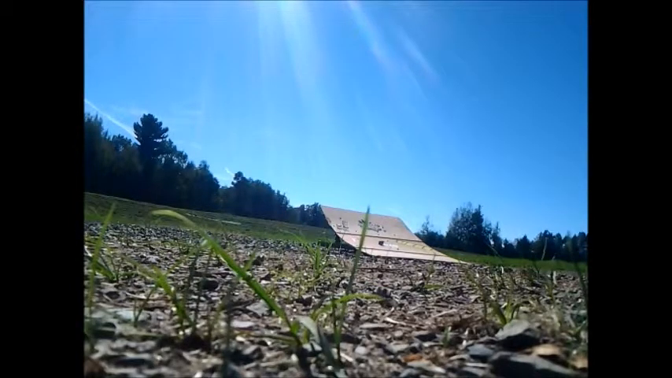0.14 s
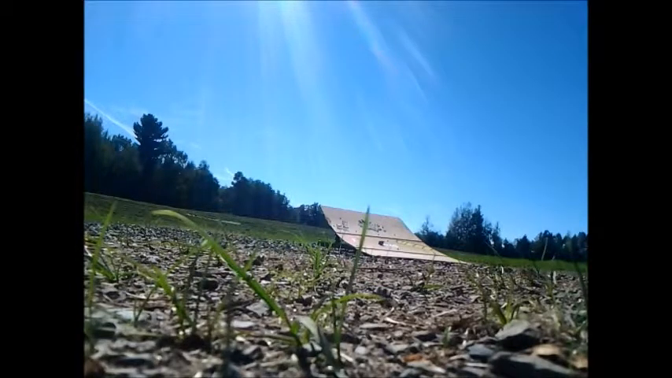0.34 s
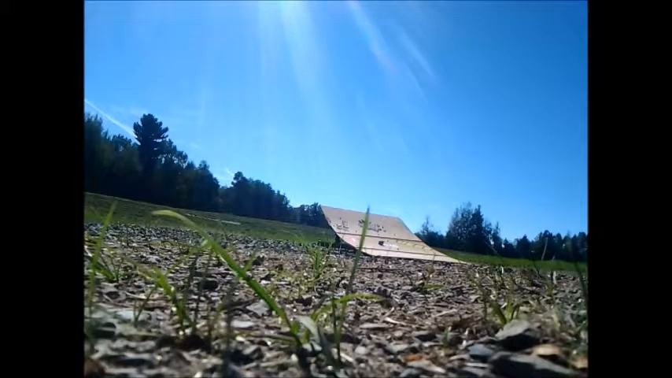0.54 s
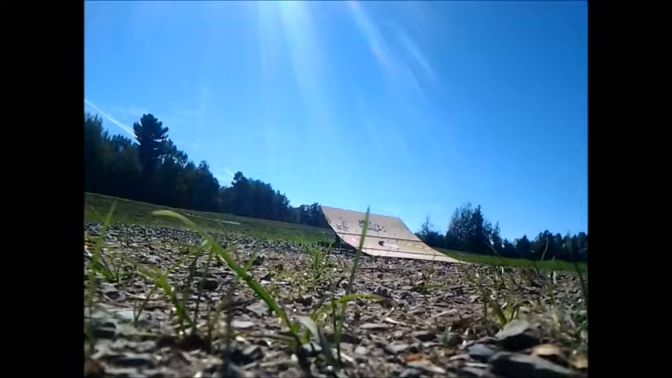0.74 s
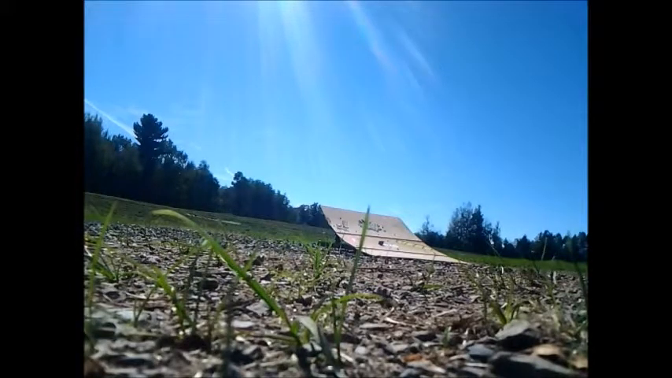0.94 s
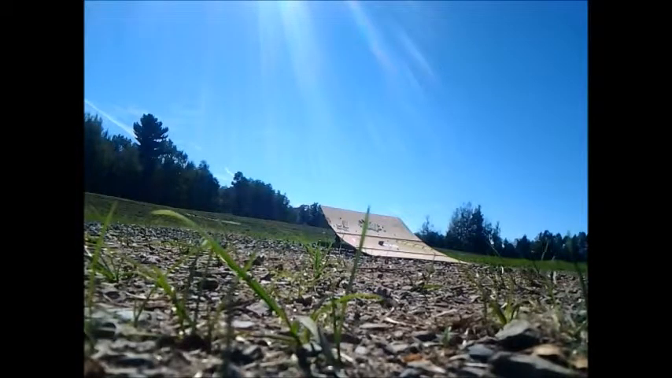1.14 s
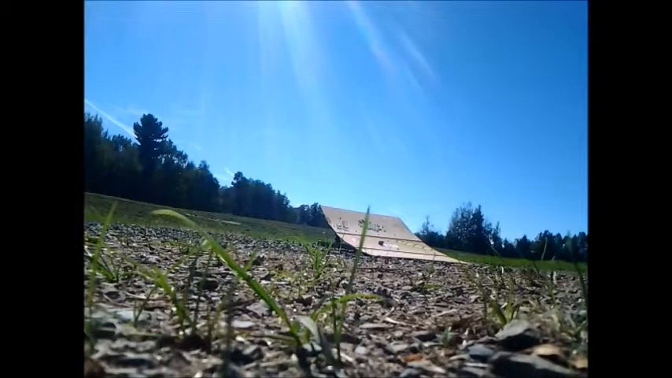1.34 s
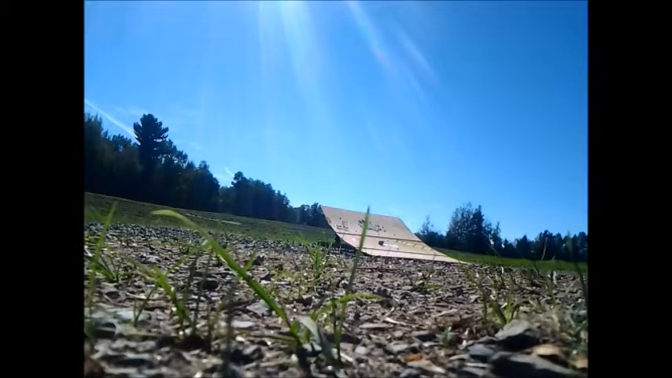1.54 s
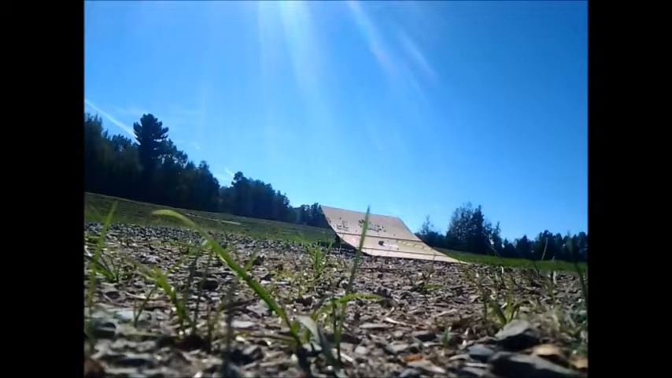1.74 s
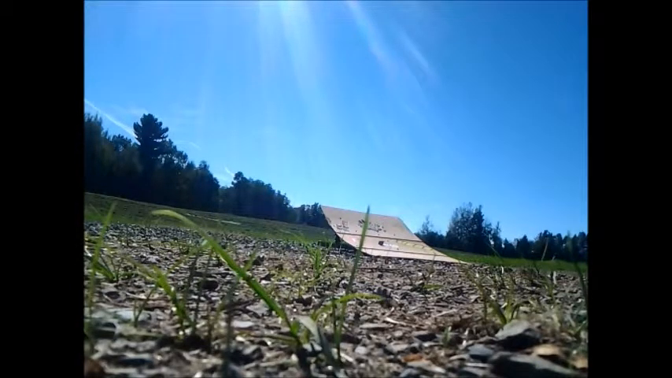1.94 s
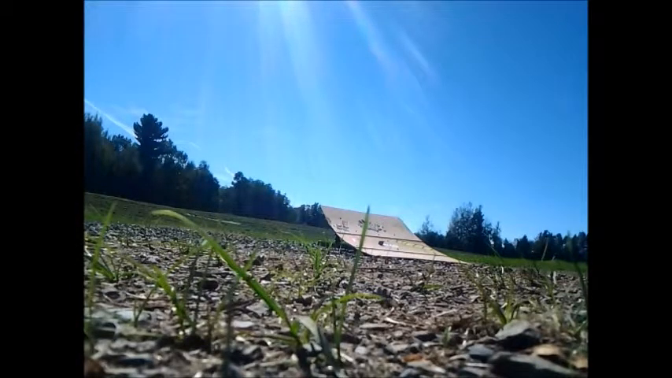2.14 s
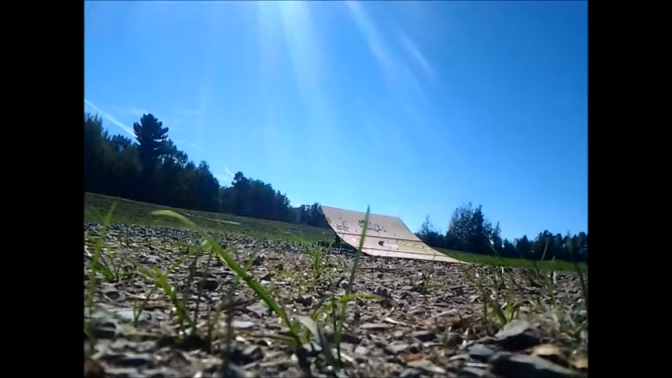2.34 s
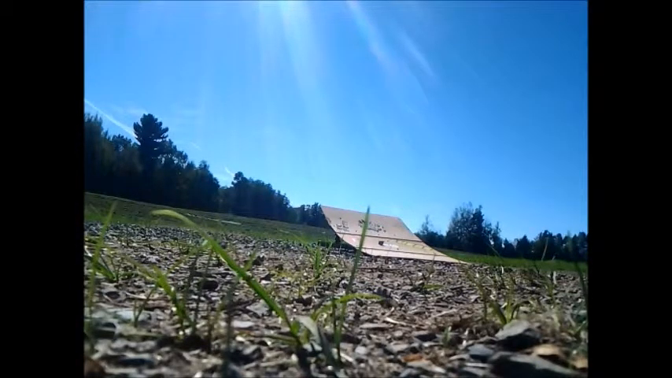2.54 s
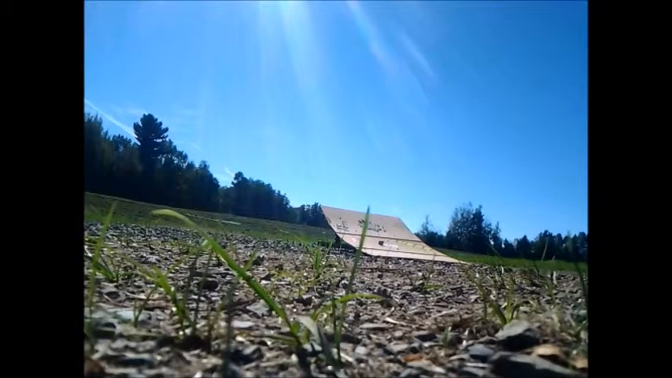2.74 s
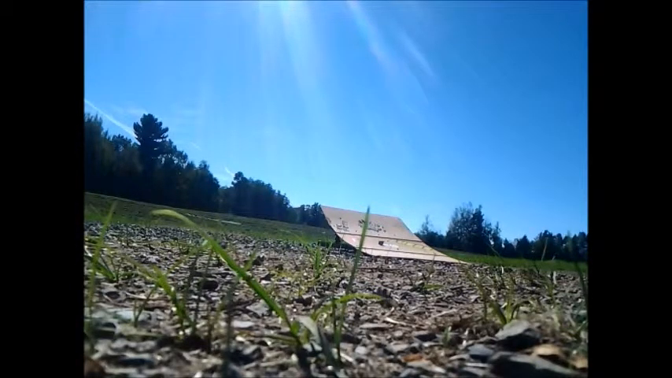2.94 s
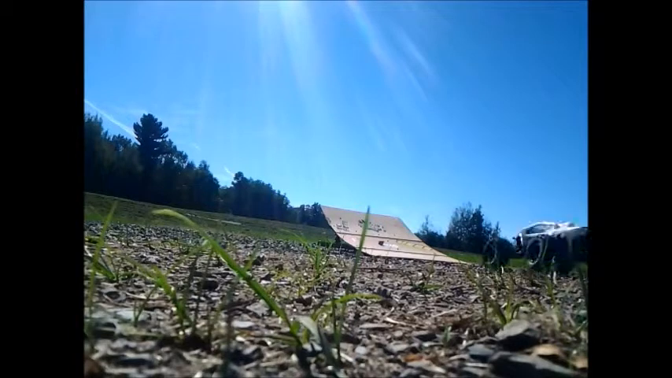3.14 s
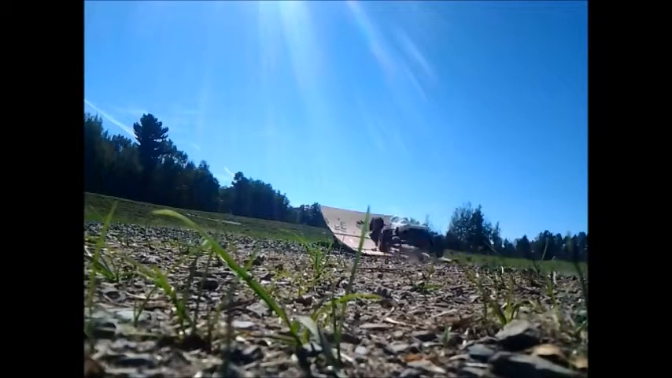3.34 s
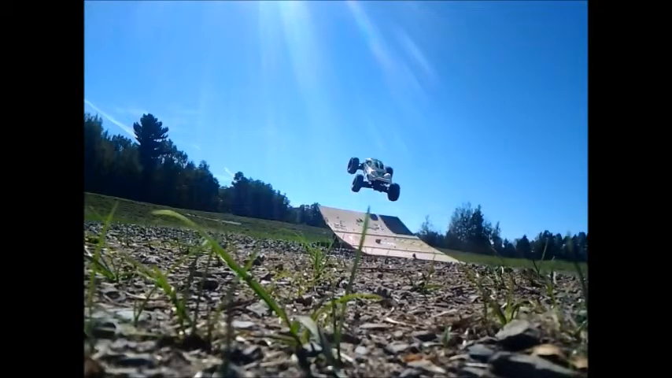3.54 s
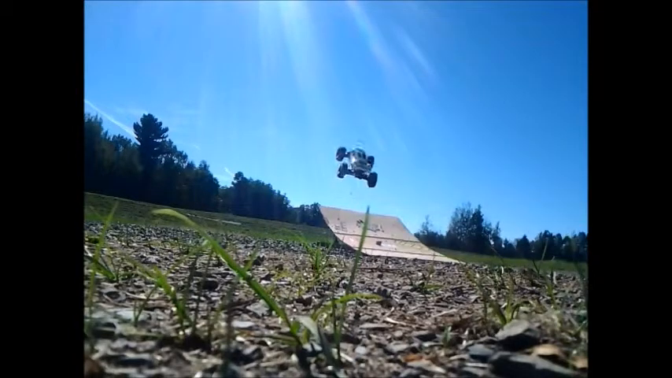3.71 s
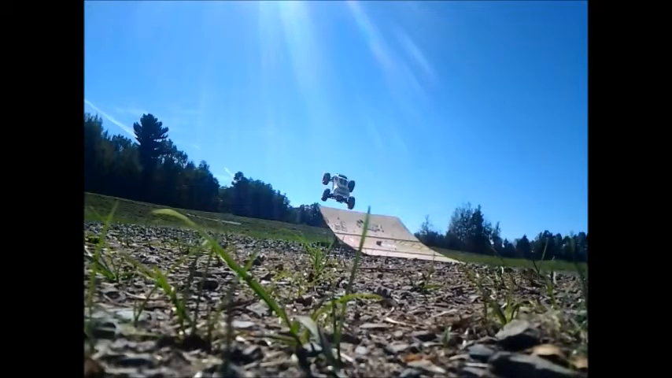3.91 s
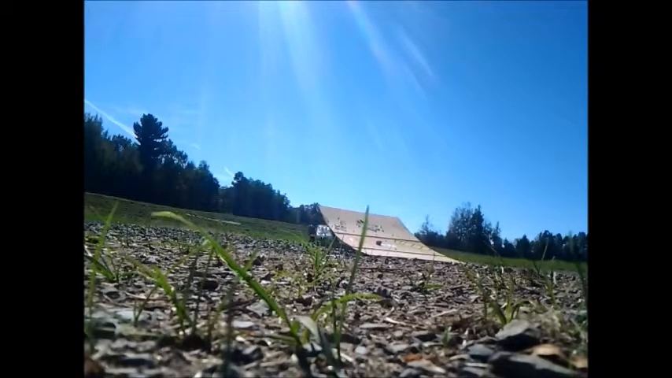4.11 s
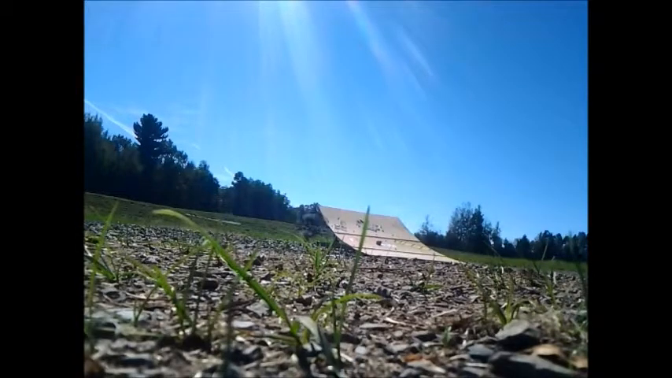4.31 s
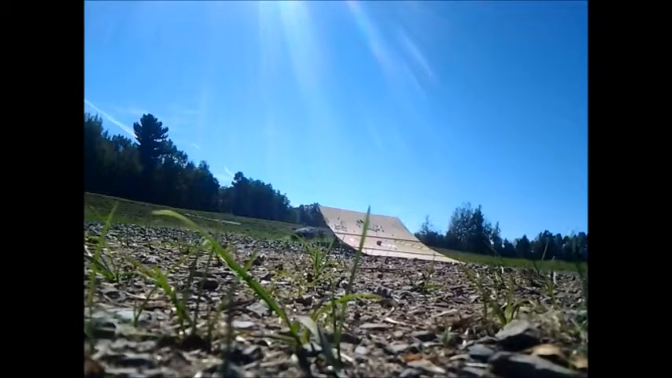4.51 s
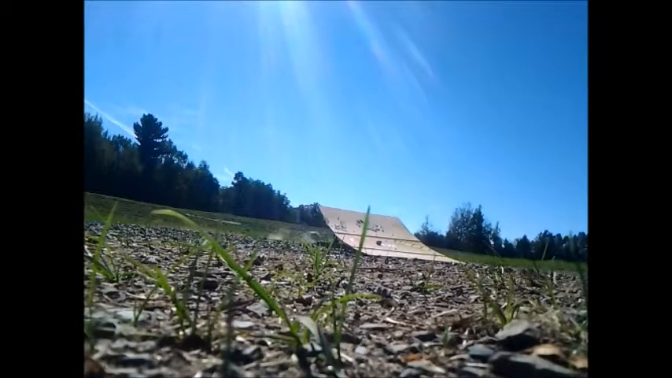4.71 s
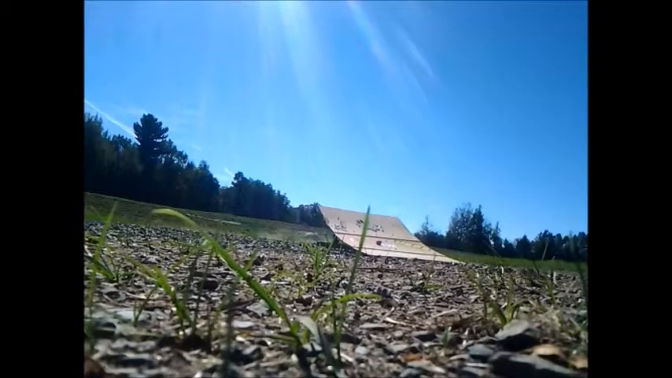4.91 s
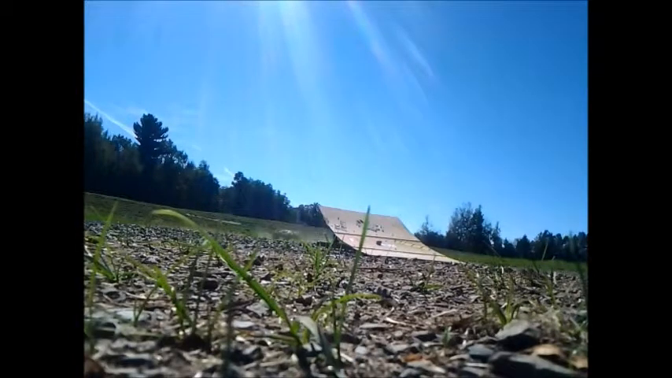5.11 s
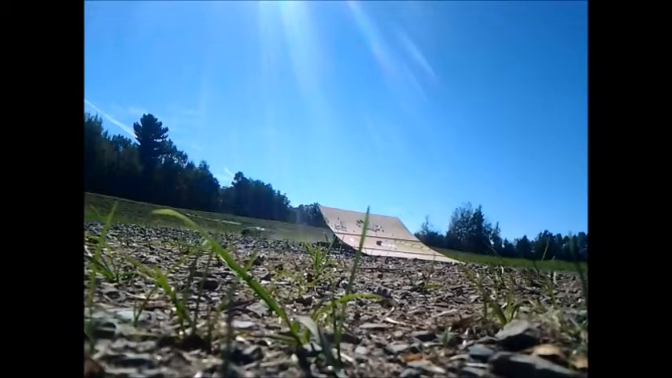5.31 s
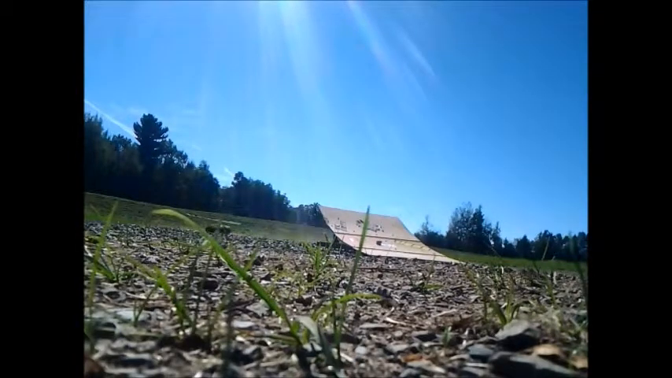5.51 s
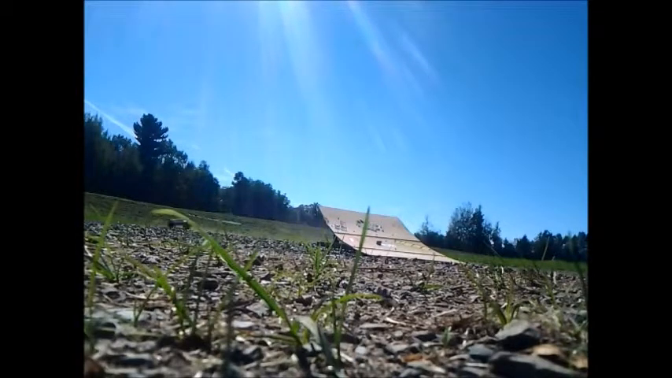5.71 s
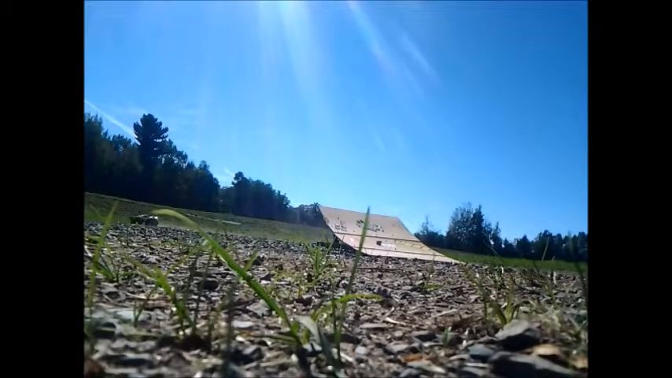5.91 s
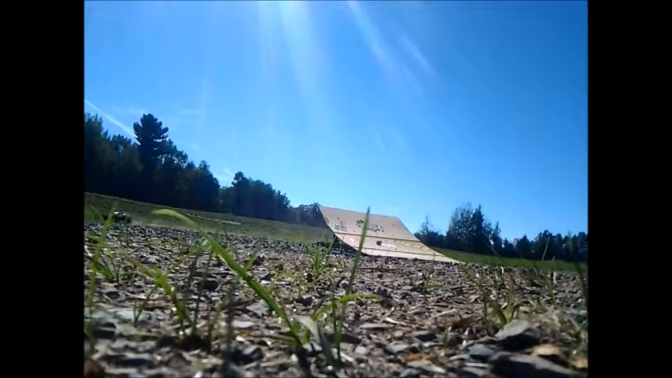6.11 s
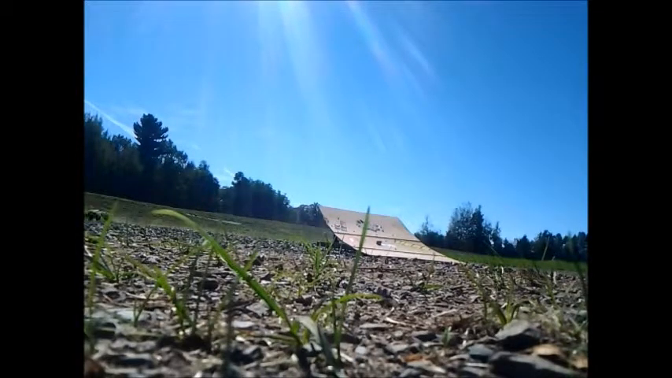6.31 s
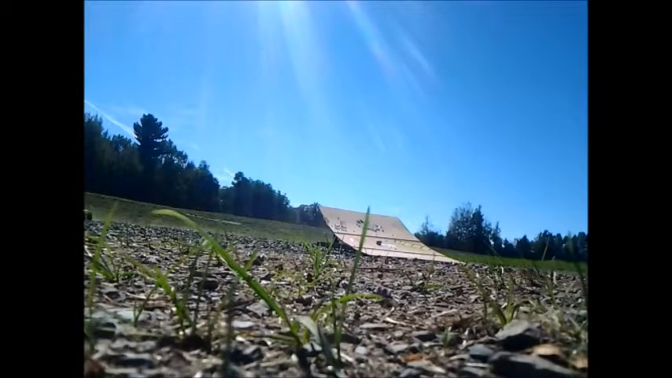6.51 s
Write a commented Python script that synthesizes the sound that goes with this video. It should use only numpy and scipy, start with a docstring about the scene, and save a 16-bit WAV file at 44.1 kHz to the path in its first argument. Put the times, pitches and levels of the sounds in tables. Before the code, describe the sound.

A quiet open field with low wind rumble, soft air murmur, faint distant hum and light hiss, with a tiny knock near 0.5 s. From about 1 s a thin electric gear whine emerges, wavering and rising in pitch as a small remote-control truck approaches; tyre crunch grows from 2 s, with knocks around 2.4 and 2.9. At 3.1-3.3 s it passes close to the ground-level microphone, loud, gritty, with sharp plastic clacks and chirring grit. At 3.5-3.65 it clatters up the wooden ramp, the whine flaring higher, then cutting off. The flight is quiet, with faint tyre noise and short squeaks. Around 4.25-4.38 s it lands in a cluster of heavy thumps and rattles; the whine returns, jerky, with more knocks until 4.8. It then runs off, whine pulsing, sagging very faint near 5.95, then reviving in uneven surges to the end at 6.5.

```python
"""Light wind, field murmur and a faint low hum come first; then a small electric off-road truck speeds in
over gravel and stubble, passes a camera lying on the ground, jumps a plywood ramp, lands with thumps
and runs off across the field. The gear whine is a gliding tone with overtones, tyre crunch is coloured
grains and noise, chassis knocks are decaying modes, squeaks and chirrs are wavering tones.
Wind and field murmur are filtered noise, as is the steady faint hiss under it all."""
import sys
import numpy as np
from scipy import signal
from scipy.fft import rfft, irfft, next_fast_len
from scipy.io import wavfile
from scipy.ndimage import uniform_filter1d

SR = 44100
rng = np.random.default_rng(int(sys.argv[2]) if len(sys.argv) > 2 else 0)


def log_audio(samples):
    """Write samples as a 16-bit WAV file to the path given in sys.argv[1]."""
    # one column per channel
    frames = np.atleast_2d(samples).T
    # limit to full scale, then quantise
    limited = np.clip(frames, -1, 1)
    pcm = np.round(limited * 32767).astype(np.int16)
    wavfile.write(sys.argv[1], SR, pcm)


N = 289291  # length of the scene [samples]

# Moments when one view of the truck hands over to the next. In pairs: start and end of each turn [s].
TURN_S = [2.2, 2.7, 3.3, 3.449, 3.9, 4.3]


def undb(db):
    """Decibels to gain."""
    return 10 ** (np.asarray(db) / 20)


def unit(x):
    """Scale to rms 1."""
    return x / np.sqrt(np.mean(x ** 2))


def colour(x, points):
    """Filter by (Hz, dB) points joined on a log-frequency axis."""
    size = next_fast_len(N)
    hz, db = np.transpose(points)
    log_hz = np.log(np.arange(size // 2 + 1) * SR / size + 1)
    gain = undb(np.interp(log_hz, np.log(hz), db))
    return irfft(rfft(x, size) * gain, size)[:N]


def band(x, lo_hz, hi_hz):
    """Steep band-pass."""
    return signal.sosfilt(signal.butter(3, [lo_hz, hi_hz], "bandpass", fs=SR, output="sos"), x)


def walk(rate):
    """Random levels held 1 / rate s and smoothed twice over that time; rms 1."""
    hold = int(SR / rate)
    steps = np.repeat(rng.standard_normal(N // hold + 1), hold)
    return unit(uniform_filter1d(uniform_filter1d(steps, hold), hold)[:N])


def ring(hz, t60, t):
    """One decaying mode."""
    return np.sin(2 * np.pi * hz * t) * np.exp(-np.log(1000) * t / t60)


def facing():
    """Side of the truck turned to the microphone: 0 front, 1 side, 2 on the ramp, 3 behind."""
    return np.interp(np.arange(N) / SR, TURN_S, [0, 1, 1, 2, 2, 3])


def tooth_motion():
    """Tooth rate [Hz] and level [dB]: the gears slow as the tyres bite and spin up as they slip."""
    # Each row: bite in seconds, tooth rate at bite in Hz, tooth rate at slip in Hz, loudest level in dB
    # before the sweep, distance and throttle cuts, place of the loudest moment in the cycle
    # (0 bite, 0.5 slip, 1 next bite).
    grips = [(0.948, 573, 597, -45, 0.89), (1.125, 593, 624, -44, 0.81), (1.235, 597, 620, -44.5, 0.5),
             (1.306, 591, 677, -46.5, 0.53), (1.384, 639, 664, -42.5, 0.59), (1.438, 626, 739, -40, 0.95),
             (1.546, 739, 806, -36.5, 0.41), (1.633, 730, 856, -37.5, 0.56), (1.722, 830, 996, -35, 0.79),
             (1.804, 962, 1270, -30, 0.7), (1.886, 1200, 1600, -31, 0.64), (1.934, 1456, 1773, -25.5, 0.43),
             (1.98, 1428, 1750, -25, 0.53), (2.045, 1650, 1612, -27, 0.16), (2.092, 1482, 1768, -25, 0.29),
             (2.142, 1540, 1724, -25, .3), (2.182, 1594, 1787, -24, .05), (2.219, 1667, 1830, -26, 0.17),
             (2.28, 1708, 1804, -22.5, 0.021), (2.341, 1843, 2025, -34.5, 0.53),
             (2.41, 1845, 2200, -28, 0.89), (2.455, 1967, 2120, -25, 0.65),
             (2.493, 1955, 2185, -23.5, 0.54), (2.526, 1892, 2196, -21, 0.4),
             (2.563, 1980, 2195, -21, 0.32), (2.598, 2018, 2080, -25, 0.86), (2.66, 2038, 2320, -18, 0.62),
             (2.711, 2244, 2330, -13, 0.59), (2.738, 2168, 2484, -15, 0.55),
             (2.782, 1972, 2231, -18.5, 0.44), (2.816, 2100, 2272, -16, 0.53),
             (2.847, 2135, 2440, -14, 0.68), (2.883, 2180, 2420, -13.5, 0.46),
             (2.917, 2145, 2400, -16.5, 0.32), (2.953, 2129, 2572, -16, 0.43),
             (2.987, 2282, 2387, -18.5, 0.88), (3.028, 2202, 2500, -16.5, 0.66),
             (3.081, 2136, 2320, -19, .3), (3.117, 2050, 2480, -17.5, 0.48),
             (3.162, 2148, 2400, -25, 0.053), (3.188, 2263, 2498, -15.5, 0.6),
             (3.217, 2380, 2500, -14.5, 0.41), (3.249, 2176, 2600, -20, 0.58),
             (3.299, 1960, 2090, -17, 0.16), (3.338, 1907, 2114, -23, 0.96), (3.385, 1964, 2230, -16, 0.8),
             (3.42, 2170, 2243, -14.5, 0.55), (3.445, 2197, 2181, -12.5, 0.42),
             (3.504, 2056, 2272, -10.5, 0.052), (3.53, 2155, 2230, -14, 0.51),
             (3.553, 2132, 2232, -9.5, 0.5), (3.575, 2198, 2440, -17.5, 0.91),
             (3.637, 2490, 3364, -23, 0.44), (3.69, 3400, 3890, -31, 0.023),
             (4.35, 2200, 2193, -27.5, 0.64), (4.399, 1480, 2310, -26, 0.62),
             (4.438, 2120, 2440, -22.5, 0.8), (4.472, 1876, 2640, -27, 0.99),
             (4.514, 2580, 2826, -25.5, 0.71), (4.562, 2057, 3240, -27, 0.97),
             (4.605, 2604, 2890, -24, .75), (4.656, 1827, 2325, -24, 0.82), (4.716, 2300, 2320, -26, 0.72),
             (4.784, 1225, 1573, -24.5, .5), (4.835, 1414, 1717, -25.5, 0.38),
             (4.884, 1710, 1830, -28.5, 0.67), (4.929, 1420, 1730, -25, 0.26),
             (4.974, 1772, 2006, -23.5, 0.46), (5.023, 1827, 1932, -25.5, 0.42),
             (5.062, 1450, 1987, -25, 0.021), (5.102, 1640, 1877, -32, 0.56),
             (5.139, 1594, 2083, -28, 0.73), (5.179, 1483, 2002, -27, 0.65), (5.222, 1445, 1953, -34, 0.4),
             (5.263, 1443, 2225, -22.5, 0.29), (5.308, 1670, 1847, -33, 0.45),
             (5.345, 1581, 1970, -23.5, 0.52), (5.401, 1657, 1902, -24, 0.53),
             (5.463, 1690, 1813, -27.5, 0.55), (5.506, 1770, 2040, -21.5, 0.44),
             (5.56, 1775, 1930, -21.5, 0.57), (5.596, 1746, 2447, -21.5, 0.85),
             (5.667, 1480, 2176, -27.5, 0.8), (5.751, 1293, 1586, -30.5, 0.73),
             (5.865, 1157, 1370, -40, 0.82), (5.955, 1121, 1254, -51, 0.57), (6.033, 1010, 1137, -38, 0.71),
             (6.105, 919, 1300, -30.5, 0.64), (6.161, 893, 1550, -28, 0.05), (6.219, 900.6, 1440, -25, 0.1),
             (6.278, 1204, 1453, -25, 0.056), (6.333, 1173, 1787, -22.5, 0.045),
             (6.387, 1370, 1900, -23, 0.75), (6.438, 1046, 1535, -20, 0.26),
             (6.495, 1444, 1614, -20.5, 0.39), (6.533, 1138, 1385, -30.5, 0.36)]
    # Spinning up drags as the truck pulls away again.
    # Each row: time in seconds, part of the cycle spent spinning up, longest spin-up in seconds.
    spin_up = [(1, .52, .035), (5.5, 0.56, .034), (5.6, 0.46, .025), (5.7, 0.4, .028), (6.1, 0.57, .034),
               (6.28, 0.54, .034), (6.33, 0.704, .04), (6.39, 0.45, .04), (6.44, 0.72, .045)]
    # Sinking of the whine half a cycle from its loudest; rough ground breaks it up more.
    # Each row: time in seconds, sinking in dB.
    swing = [(1.1, 8.5), (1.85, 5.5), (2.05, 2.5), (2.3, 13), (2.5, 14.5), (3.35, 11.5), (3.5, 12),
             (3.65, 2), (4.38, 18), (4.41, 16), (4.44, 4.5), (4.48, 15), (4.6, 25), (4.68, 21),
             (4.72, 13.5), (4.79, 6), (4.9, 7), (5.1, 16), (5.2, 1), (5.3, 15), (5.4, 17), (5.5, 14),
             (5.6, 17), (5.68, 19), (5.8, 21), (5.95, 21), (6.1, 21), (6.16, -0.5), (6.2, 6), (6.35, 7),
             (6.5, 7)]
    # Throttle for the jump: starts closing, closed, starts opening on landing, open [s].
    airborne_s = (3.7, 3.74, 4.3, 4.361)
    coast_db = -35
    emerge_s, hidden_db = (0.88, 1.22), -19  # the whine rises out of the distance
    spin_db, brake_db = 0.23, 0.03  # level lost per kHz/s of speeding up, of slowing down [dB]

    s, bite_hz, slip_hz, peak_db, loudest = np.transpose(grips)
    spin_s, share, longest_s = np.transpose(spin_up)
    cycle_s = np.diff(s, append=N / SR)
    lag_s = np.interp(s, spin_s, share.clip(.1, .9)) * cycle_s
    lag_s = np.minimum(lag_s, np.interp(s, spin_s, longest_s))

    # four load points per cycle
    quarters = np.arange(4) / 4
    sinking = np.sin(np.pi * (quarters - loudest[:, None])) ** 2
    loads_db = peak_db[:, None] - np.interp(s, *np.transpose(swing))[:, None] * sinking

    # bites and slips alternate; the tiny steps keep the times increasing
    t = np.arange(N) / SR
    turns_s = np.c_[s, s + lag_s].ravel() + 1e-6 * np.arange(2 * len(s))
    turns_s = np.maximum.accumulate(turns_s)
    order = np.arange(len(turns_s))
    place = np.interp(t, turns_s, order)
    part = place % 1
    # the spinning mass rounds each turn
    eased = place - part + (1 - np.cos(np.pi * part)) / 2
    hz = np.interp(eased, order, np.c_[bite_hz, slip_hz].ravel())

    db = np.interp(2 * place, np.arange(2 * len(turns_s)), loads_db.ravel())
    sweep = np.gradient(hz) * SR / 1000  # [kHz/s]
    # teeth unload most while the wheels spin free
    db = db - spin_db * sweep.clip(0, None) + brake_db * sweep.clip(None, 0)
    db = db + np.interp(t, emerge_s, [hidden_db, 0])
    db = db + np.interp(t, airborne_s, [0, coast_db, coast_db, 0])
    return hz, db


def gears():
    """Meshing teeth: a tone that swings smoothly between bite and slip, with uneven tooth contact."""
    # Each row: multiple of the tooth rate, level in dB before the tooth-edge level and end-on shade.
    overtones = [(2, -10), (3, -26)]
    # Tooth edges against the tone. Each row: time in seconds, level in dB.
    edges = [(1.5, 8), (1.9, -5), (2.2, -7), (2.45, 9), (2.6, 10.5), (2.72, -1.5), (2.85, 11), (3.0, 10),
             (3.15, 4), (3.3, 5.5), (3.45, -17), (3.9, -13), (4.4, 3), (4.5, 6), (4.6, -4), (4.75, -18),
             (4.85, -2), (5.0, -7), (5.2, -16), (5.4, -12), (5.6, -5), (5.8, -13), (6.1, -1), (6.3, -5),
             (6.4, -1), (6.47, -5), (6.56, 6)]
    # Pitches that chassis shell and camera housing favour. Each row: frequency in Hz, gain in dB.
    shell = [(500, -4), (900, 2), (1250, -4.5), (1550, -12), (1900, -6), (2250, -4), (2600, -6.5),
             (3000, -10.5), (4000, -2), (5500, -38), (8000, -130)]
    # Shell panel: low edge in Hz, high edge in Hz, level against the whine in dB, reach in Hz.
    panel = (2294, 2464, -14, 514)
    shade_db_per_khz = 12.5  # seen from either end, the shell hides the treble of the gears

    hz, db = tooth_motion()
    phase = 2 * np.pi * np.cumsum(hz * (1 + .018 * walk(300))) / SR
    tone = np.sin(phase) * undb(2.0 * walk(150))
    edges_db = np.interp(np.arange(N) / SR, *np.transpose(edges))
    end_on = np.clip(abs(facing() - 1.5) - .5, 0, 1)
    for multiple, rel_db in overtones:
        # overtones come from tooth edges, which wander and break up
        shade_db = shade_db_per_khz * np.clip(multiple * hz - 2700, 0, None) / 1000 * end_on
        gain = undb(rel_db + edges_db - shade_db + 4 * walk(45))
        tone = tone + gain * np.sin(multiple * phase + .9 * walk(220))

    # the overtone at twice the tooth rate rattles the panel whenever it passes its pitch
    lo_hz, hi_hz, panel_db, reach_hz = panel
    near = np.exp(-((2 * hz - (lo_hz + hi_hz) / 2) / reach_hz) ** 2)
    rattle_gain = uniform_filter1d(near * undb(db + panel_db), SR // 60)
    rattle = unit(band(rng.standard_normal(N), lo_hz, hi_hz)) * rattle_gain
    return np.sqrt(2) * colour(undb(db) * tone, shell) + rattle


def scatter(x):
    """Rough ground returns a short diffuse smear."""
    smear_db, smear_t60_s = -15, .08
    t = np.arange(SR // 8) / SR
    tail = rng.standard_normal(len(t)) * np.exp(-np.log(1000) * t / smear_t60_s)
    tail = tail * (t > .003)
    return x + undb(smear_db) * signal.fftconvolve(x, tail / np.sqrt(np.sum(tail ** 2)))[:N]


def roll_levels():
    """Rumble, crunch, scrub and grit in dB: the passing level plus a brief change at each jolt."""
    # Each row: time in seconds, tyre crunch in dB, rumble against it in dB, grit spray against it in dB.
    roll = [(0, -64.5, 12.5, 3), (.5, -57.5, 7.5, -2.5), (1.15, -47.5, -4, -9), (1.41, -52, 1.5, -1),
            (1.549, -47, -5.5, -2.5), (2.05, -41.5, -6.5, 0), (2.35, -37, -13, -1.5), (2.5, -33, -15, -0.5),
            (2.75, -28.5, -10.5, -2), (2.92, -26.5, -16.5, -0.5), (3.08, -25, -11.5, -3),
            (3.229, -22, -6.5, -1.5), (3.327, -28.5, -10.5, 0.5), (3.47, -24.5, -1.5, -15.5),
            (3.58, -20.5, -6.5, -14.5), (3.68, -26, -5.5, -10.5), (3.779, -34, -10.5, -14),
            (3.9, -39.5, -6.5, -12), (4.13, -44, -14.5, -14.5), (4.4, -37.5, -16, -14),
            (4.55, -36, -14, -11), (4.95, -40.5, -6, -13.5), (5.5, -36, -9.5, -20), (5.7, -38, -8.5, -16.5),
            (5.78, -42.5, -7.5, -20), (6.0, -37.5, -16, -20.5), (6.1, -40.5, -11, -17.5),
            (6.17, -36.5, -17, -18), (6.27, -37.5, -7.5, -12), (6.56, -40, -9, -14)]
    # The tyres slam over a rut or touch down.
    # Each row: time in seconds, rise of the rumble in dB, rise of the crunch, scrub and grit in dB.
    jolts = [(2.41, 7, 0), (2.938, 12.5, 2), (3.05, 7.5, 2.5), (3.2, 2.5, -2), (3.29, 8, -2.5),
             (3.509, 4, -0.5), (3.761, 10, 2), (3.83, -1, 4), (3.963, 2, 6), (4.06, 4, 4.5), (4.2, 7, 10),
             (4.276, 30, 11.5), (4.343, 29, 6.5), (4.65, 11, -5), (4.74, 16, 2.5)]
    jolt_s = 0.023
    # Scrub against the crunch [dB] from the front, side, ramp, behind, before its share of the grit.
    scrub_db = [-3, 0.5, 5, 5.5]
    scrub_share = 0.59  # share of the grit's swell that the scrub follows

    t = np.arange(N) / SR
    s, *columns = np.transpose(roll)
    crunch, rumble, grit = (np.interp(t, s, column) for column in columns)
    low, mid = sum(np.outer(rise, np.exp(-((t - at) / jolt_s) ** 2)) for at, *rise in jolts)
    scrub = np.interp(facing(), range(4), scrub_db) + scrub_share * grit
    return crunch + np.array([rumble + low, mid, scrub + mid, grit + mid])


def tyres():
    """Stones and stalks crushed under knobbly tyres: dense uneven grains, coloured by the side that faces us."""
    # Tyre colour from the front, side, ramp and behind. Each row: frequency in Hz, density in dB per Hz.
    front = [(53, -39), (90, -9), (155, -11.5), (212, -12.5), (311, -15.5), (567, -2), (1130, 11),
             (1360, -12.5), (1690, 5.5), (2030, 4), (2390, 5.5), (3080, -25), (3380, -20.5), (4440, -23.5),
             (7000, -44), (9100, -96), (15400, -120)]
    side_on = [(53, -29), (90, -9), (224, -2), (416, -0.5), (787, 6.5), (1090, 4), (1430, -10.5),
               (1690, -3.5), (1960, 9.5), (2300, -8), (3080, -30.5), (4520, -37.5), (7000, -43.5),
               (9100, -93), (15400, -120)]
    ramp = [(53, -39), (90, -32.5), (190, -23), (224, -26.5), (311, -17), (353, -20), (609, -12),
            (910, -1.5), (1380, -15.5), (2140, -1), (2570, -19), (3300, -18.5), (4520, -13), (7000, -46),
            (9100, -77), (15400, -120)]
    behind = [(53, -23), (90, -20), (220, -17), (340, -16.5), (560, -4), (720, 3.5), (831, 7), (960, 2),
              (1170, 3), (1290, -11), (1430, -4.5), (1540, -12.5), (2260, -1), (2620, -19), (3200, -27.5),
              (4000, -31.5), (4860, -37), (7000, -140), (9100, -77), (15400, -120)]
    # Rumble, crunch, scrub and grit. Each row: low edge in Hz, high edge in Hz.
    roll_bands = [(60, 400), (400, 1500), (1500, 3000), (3000, 6500)]
    # Unevenness of each band.
    # Each row: share of the truck's hop in dB, own flicker in dB, flicker rate per second.
    roll_flicker = [(-1.5, -1, 18), (0.23, 1.8, 45), (2.4, -0.46, 17), (1.9, 1.54, 98)]
    # Fine dust thrown up close by. Each row: time in seconds, coarse level in dB, fine level in dB.
    dust = [(2.3, -102, -96), (2.6, -81, -97), (2.9, -58.5, -99), (3.2, -54, -61), (3.35, -48.5, -49.5),
            (3.45, -70, -80), (3.55, -58, -64), (3.671, -48, -44.5), (3.8, -75, -60), (4.05, -64.5, -66.5),
            (4.2, -79, -75)]
    # The plastic body shell drums along: low and high edge [Hz].
    body_ring = (730, 869)
    # Drumming against the crunch [dB] from the front, side, ramp, behind.
    body_db = [-14, -10, -23, -9]

    t = np.arange(N) / SR
    levels, view = roll_levels(), facing()
    chance = rng.random((2, N))
    struck = chance[0] < 3000 / SR  # about 3000 stones a second
    sizes = undb(-1.5 * np.log(1 - .995 * chance[1]))
    stones = struck * sizes * rng.standard_normal(N)
    grains = unit(stones) + 1.5 * rng.standard_normal(N)

    seen = [colour(grains, points) for points in (front, side_on, ramp, behind)]
    hop = walk(16)  # the whole truck hops on its springs
    out = 0
    for level_db, (lo_hz, hi_hz), (hop_db, own_db, rate) in zip(levels, roll_bands, roll_flicker):
        part = sum(np.clip(1 - abs(view - k), 0, 1) * unit(band(x, lo_hz, hi_hz))
                   for k, x in enumerate(seen))
        out = out + part * undb(level_db + hop_db * hop + own_db * walk(rate))

    dust_s, *dust_db = np.transpose(dust)
    puffs = undb(3.0 * walk(18))
    for db, edges_hz in zip(dust_db, [(6000, 9500), (9500, 16000)]):
        gain = undb(np.interp(t, dust_s, db, left=-120, right=-120))
        out = out + puffs * unit(band(grains, *edges_hz)) * gain

    # low-passed grains ride on a tone; the flexing shell shifts its pitch
    lo_hz, hi_hz = body_ring
    centre_hz = (lo_hz + hi_hz) / 2 * (1 + .06 * walk(9))
    carrier = np.sin(2 * np.pi * np.cumsum(centre_hz) / SR)
    drum = unit(band(grains, 1, (hi_hz - lo_hz) / 2) * carrier)
    drum_db = levels[1] + np.interp(view, range(4), body_db) + 3.38 * walk(30)
    return out + drum * undb(drum_db)


def chirrs():
    """A rough flutter of seven continuous wavering tones inside the grit, heard only while side on."""
    chirr_hz = [3350, 3550, 3750, 3950, 4200, 4450, 4700]  # centre of each wavering tone [Hz]
    chirr_db = -11  # each tone against the grit
    side_share = np.interp(np.arange(N) / SR, TURN_S[:4], [0, 1, 1, 0])
    flutter = 0
    for hz in chirr_hz:
        phase = 2 * np.pi * np.cumsum(hz * (1 + .035 * walk(220))) / SR
        flutter = flutter + np.sin(phase) * undb(4.0 * walk(170))
    return flutter * side_share * undb(roll_levels()[3] + chirr_db)


def knocks():
    """Each blow thuds into the ground, rings the chassis modes, one panel most, and throws a scatter of dirt."""
    # Chassis blows. Each row: start in seconds, peak level in dB, main ring in Hz.
    blows = [(.462, -45, 915), (2.4, -26, 844), (2.468, -27, 1033), (2.918, -20.5, 850), (3.138, -13, 676),
             (3.176, -8, 745), (3.289, -23, 977), (3.367, -14, 1050), (3.476, -14.5, 655),
             (3.498, -12, 334), (3.556, -13.5, 400), (3.596, -9, 1189), (3.616, -10.5, 1204),
             (3.638, -14, 1250), (4.254, -21, 980), (4.272, -15.5, 421), (4.283, -12, 1114),
             (4.314, -24, 798), (4.336, -15, 637), (4.349, -30, 688), (4.377, -28, 1020), (4.513, -24, 696),
             (4.634, -18, 770), (4.66, -33, 800), (4.721, -21.5, 627), (4.738, -21.5, 1128),
             (4.748, -25.5, 895), (4.775, -22, 1104), (5.357, -32, 826)]
    # Modes shared by all blows, shifted a little at each.
    # Each row: centre frequency in Hz, level against the main ring in dB, t60 in seconds.
    chassis = [(129.9, -33, 0.028), (360, -19.5, 0.014), (653, -1.5, 0.042), (1144, -3.5, 0.046)]
    # Scatter of dirt. Each row: frequency in Hz, gain in dB.
    dirt_colour = [(300, -22), (900, -5), (1500, -8), (2200, 22), (3200, -4), (4500, -6), (6500, -73)]
    panel_t60_s, thud_db, dirt_db = 0.059, -4.5, -10.5

    out, t = np.zeros(N + SR), np.arange(SR // 5) / SR
    jitters = rng.standard_normal((len(blows), len(chassis)))
    for (s, peak_db, hz), jitter in zip(blows, jitters):
        blow = ring(hz, panel_t60_s, t)
        for (mode_hz, mode_db, mode_t60), shift in zip(chassis, jitter):
            blow = blow + undb(mode_db) * ring(mode_hz * (1 + 0.066 * shift), mode_t60, t)
        thud = unit(band(rng.standard_normal(len(t)), 150, 1130)) * np.exp(-t / 0.005)
        burst = rng.standard_normal(len(t)) * np.exp(-t / 0.0028)
        dirt = colour(np.pad(burst, (0, N - len(t))), dirt_colour)[:len(t)]
        blow = blow + undb(thud_db) * thud + undb(dirt_db) * dirt
        blow = blow * (1 - np.exp(-t / 0.00092))  # rubber softens the contact
        i = int(s * SR)
        out[i:i + len(t)] += undb(peak_db) * blow / np.abs(blow).max()
    return out[:N]


def squeaks():
    """Brief stick-slip tones of tyre or spring that swell, glide and stop."""
    # Each row: start in seconds, length in seconds, start pitch in Hz, end pitch in Hz,
    # level in dB about which it flutters.
    glides = [(1.927, 0.057, 1085, 1080, -39), (2.949, 0.092, 776, 694, -30),
              (3.057, 0.055, 802.5, 733, -23), (3.33, 0.02, 2570, 2578, -30),
              (3.352, 0.02, 2660, 2550, -28), (3.566, 0.089, 1049, 1300, -27.5),
              (3.753, 0.045, 970, 910, -28.5), (4.182, 0.038, 991, 785, -31.5),
              (4.483, 0.0717, 589, 705, -36.5), (5.226, 0.034, 805, 812, -36.5),
              (5.705, 0.029, 815, 725, -33), (3.809, 0.036, 934, 890, -37),
              (3.679, 0.041, 1990, 1917, -31.5)]
    out, rough = np.zeros(N), undb(3.0 * walk(160))
    waver = 1 + .03 * walk(200)
    for s, length, start_hz, end_hz, db in glides:
        size, i = int(length * SR), int(s * SR)
        hz = np.linspace(start_hz, end_hz, size) * waver[i:i + size]
        tone = np.sin(2 * np.pi * np.cumsum(hz) / SR)
        out[i:i + size] += np.sqrt(2) * undb(db) * tone * signal.windows.tukey(size, .5)
    return out * rough


def field():
    """Open-air murmur, and light wind that makes the lowest octaves heave."""
    # Colour of the open field. Each row: frequency in Hz, density in dB per Hz.
    air_colour = [(12, -66), (20, -8.5), (48, 3.5), (92, -0.5), (129, -2), (283, -12), (445, -25.5),
                  (490, -14), (668, -11), (955, -4.5), (1030, -8.5), (1300, -14), (2000, -26), (6000, -37),
                  (7800, -40.5), (13200, -120)]
    # Wind on the microphone. Each row: time in seconds, level in dB about which it heaves.
    breeze = [(0, -53.5), (.16, -44), (.7, -61), (1.9, -53.5), (2.399, -53.5), (2.7, -53), (3.3, -52),
              (3.9, -47.5), (4.4, -53.5), (4.9, -52), (5.4, -62), (6.2, -63), (6.56, -50)]
    murmur_db = -46  # before the band-pass
    air = band(unit(colour(rng.standard_normal(N), air_colour)), 90, 8000)
    wind = unit(band(colour(rng.standard_normal(N), air_colour), 15, 90))
    breeze_db = np.interp(np.arange(N) / SR, *np.transpose(breeze))
    return undb(murmur_db) * air + wind * undb(breeze_db + 2.0 * walk(4.5))


def hum():
    """A faint low hum from far off: two tones, each wavering by itself, that die away together."""
    # Each row: time in seconds, lower tone in Hz, upper tone in Hz, level of the lower tone in dB.
    drift = [(0, 123.6, 185.3, -58.5), (1.3, 124.4, 183.2, -56), (1.6, 144.3, 180, -60),
             (2.0, 144, 171.3, -57), (2.25, 125.6, 160, -57), (2.5, 120, 155.1, -77)]
    upper_db = -2.5  # upper tone against the lower
    t = np.arange(N) / SR
    s, low_hz, high_hz, db = np.transpose(drift)
    tones = 0
    for hz, rel_db in [(low_hz, 0), (high_hz, upper_db)]:
        phase = 2 * np.pi * np.cumsum(np.interp(t, s, hz) * (1 + .015 * walk(12))) / SR
        tones = tones + np.sin(phase) * undb(rel_db + 2.5 * walk(10))
    return np.sqrt(2) * tones * undb(np.interp(t, s, db))


def scene():
    """One microphone feeds both channels; only the whine gets the smear of the ground."""
    truck = scatter(gears()) + tyres() + chirrs() + knocks() + squeaks()
    return np.tile(truck + field() + hum(), (2, 1))


def record(dry):
    """Add a steady faint hiss, nearly alike in both channels, and cut the top."""
    hiss_db, top_hz = -69.5, 15250
    mid, side = (unit(band(rng.standard_normal(N), 4500, 17000)) for _ in range(2))
    hiss = undb(hiss_db) * (mid + 0.27 * side * np.array([[1], [-1]]))
    low_pass = signal.ellip(10, .2, 80, top_hz, fs=SR, output="sos")
    return signal.sosfilt(low_pass, dry + hiss)


dry = scene()
out = record(dry)
log_audio(out)
```